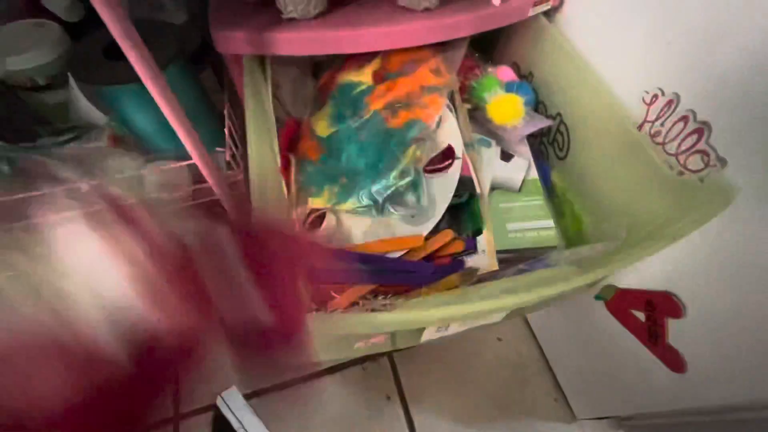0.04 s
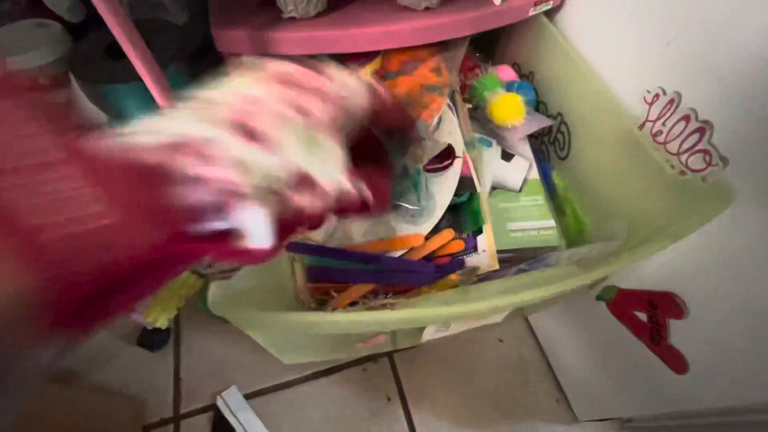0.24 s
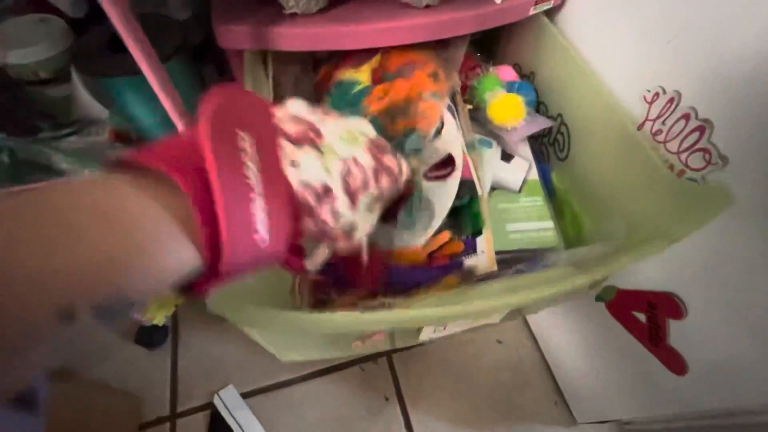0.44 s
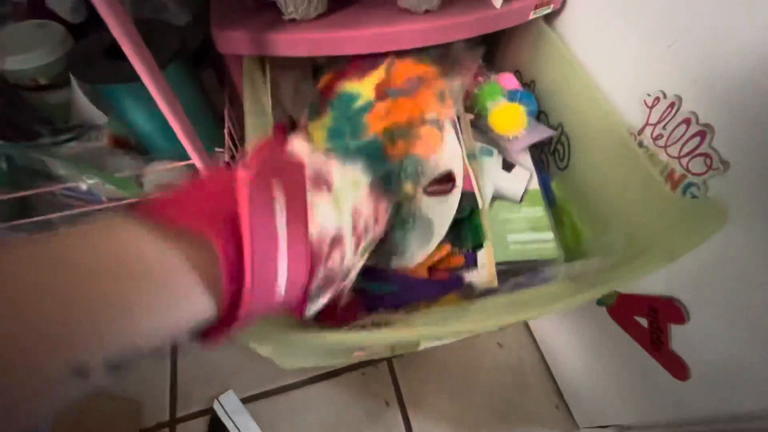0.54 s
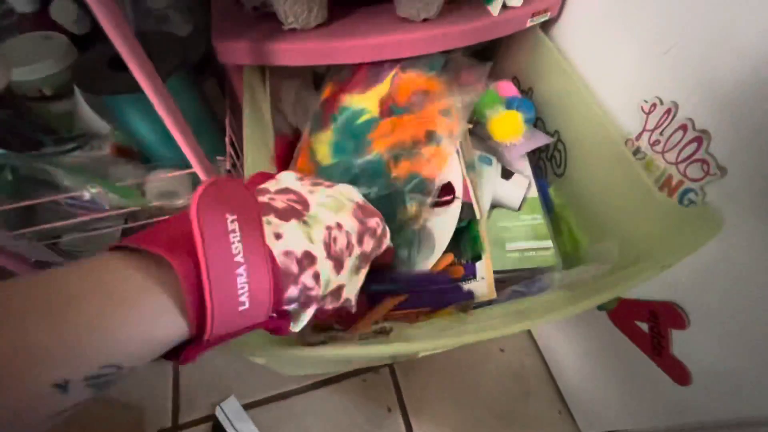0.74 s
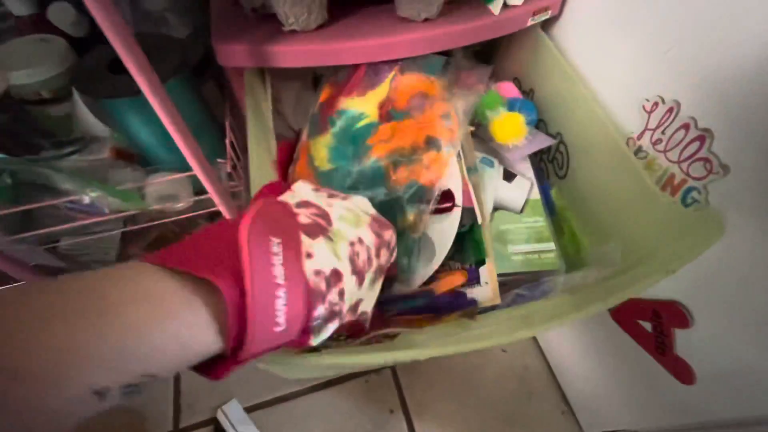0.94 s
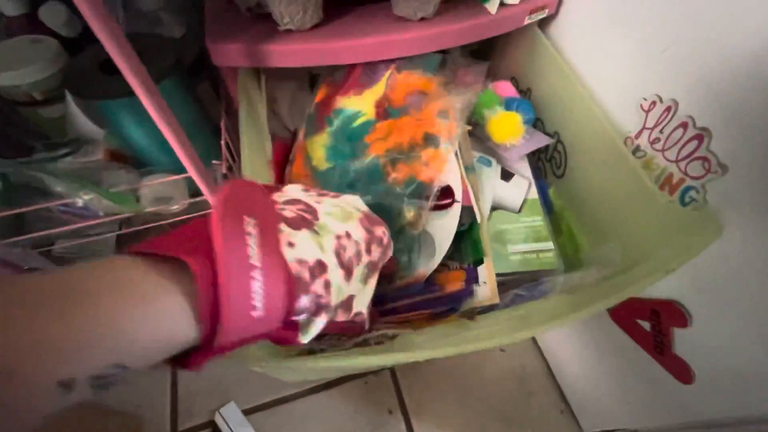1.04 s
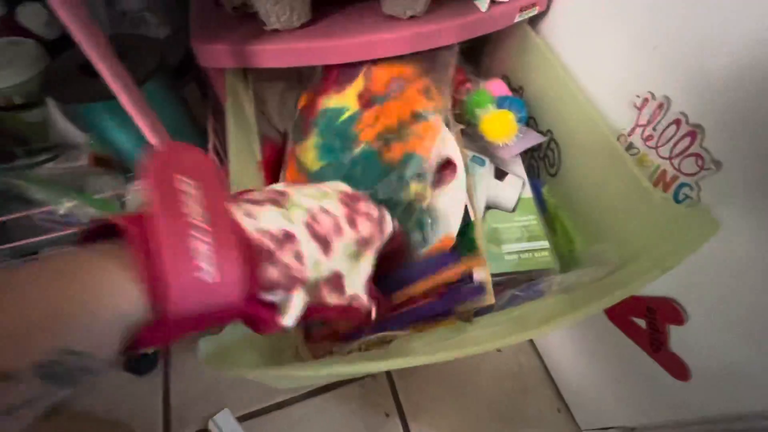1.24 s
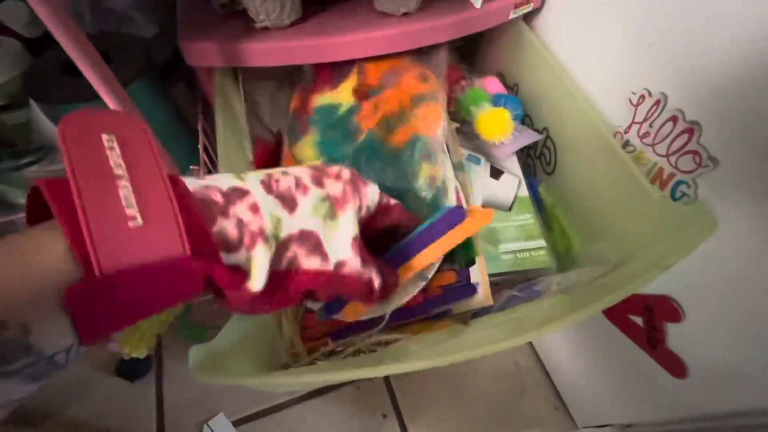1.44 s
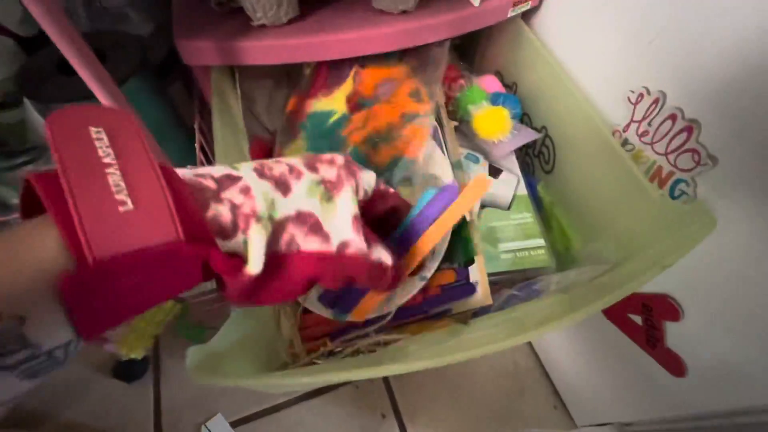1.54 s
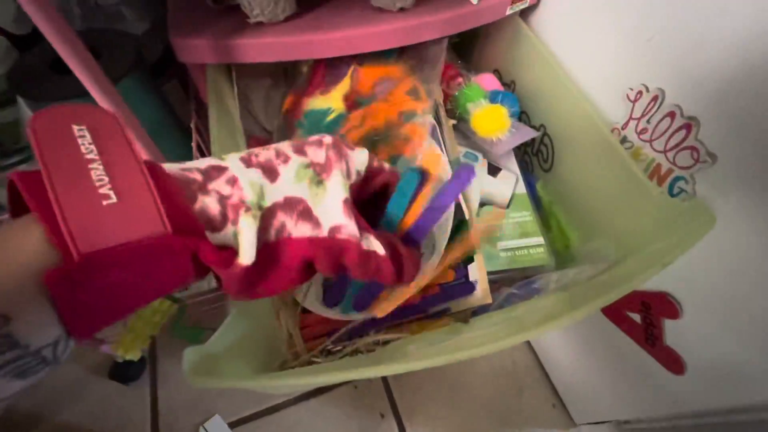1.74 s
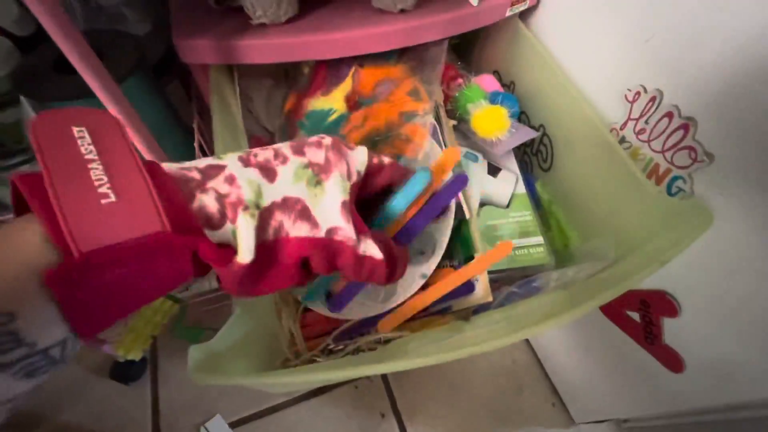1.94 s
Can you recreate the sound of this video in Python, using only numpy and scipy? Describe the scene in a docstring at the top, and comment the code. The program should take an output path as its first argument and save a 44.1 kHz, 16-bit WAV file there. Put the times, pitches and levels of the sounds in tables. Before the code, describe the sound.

A gloved hand rummages through a plastic drawer close by. Plastic film crinkles and snaps, the drawer walls thud softly, then wooden craft sticks clack together as they are pulled out, in a quietly humming room.

```python
"""Rummaging in a craft drawer

A gloved hand digs through a plastic drawer of craft things and pulls out a bundle of sticks.
Film and sticks snap in gritty bursts over a crackling rustle, the sticks clack with a woody ring,
and knocks and sliding contents make the drawer walls thud. A quiet room hums behind.
It is all heard from close by, in stereo."""
import sys
import numpy as np
from scipy import signal
from scipy.fft import rfft, irfft
from scipy.io import wavfile
from scipy.ndimage import uniform_filter1d

SR = 44100
rng = np.random.default_rng(int(sys.argv[2]) if len(sys.argv) > 2 else 0)


def persist_wave(psi):
    """Save psi, clipped to +-1, as 16-bit WAV."""
    counts = np.round(np.clip(psi, -1, 1) * 32767).astype(np.int16)
    wavfile.write(sys.argv[1], SR, np.atleast_2d(counts).T)


N = 88200

# Tone colour of the plastic film at the microphone. Each row: frequency in Hz, level in dB per Hz.
FILM_COLOUR = [(350, -6), (600, -1), (1530, -1.5), (5080, -6), (5660, -10.5), (6400, -3), (9890, -9),
               (12000, -0.5), (15500, -20)]


def amp(db):
    return 10 ** (np.asarray(db) / 20)


def rms_one(x):
    return x / np.sqrt(np.mean(x ** 2) + 1e-20)


def in_time(rows):
    seconds, values = np.transpose(rows)
    return np.interp(np.arange(N) / SR, seconds, values)


def at_hz(rows, hz, column=1):
    rows = np.array(rows, float)
    return np.interp(np.log(hz + 1), np.log(rows[:, 0]), rows[:, column])


def filtered(x, order, hz, kind):
    return signal.sosfilt(signal.butter(order, hz, kind, fs=SR, output="sos"), x)


def fade(clicks, t60, rise_s):
    """Each click becomes an envelope: quick attack, exponential decay."""
    decay = signal.lfilter([1], [1, -amp(-60 / (t60 * SR))], clicks + 1e-18)
    r = np.exp(-1 / (rise_s * SR))
    return signal.lfilter([(1 - r) ** 2], [1, -2 * r, r * r], decay)


def drift(hz):
    """A smooth random wobble, rms 1."""
    r = np.exp(-2 * np.pi * hz / SR)
    return rms_one(signal.lfilter([1], [1, -2 * r, r * r], rng.standard_normal(N + SR))[SR:])


def ring(force, hz, t60):
    """One struck mode: a decaying sine."""
    r, w = amp(-60 / (t60 * SR)), 2 * np.pi * hz / SR
    return signal.lfilter([0, np.sin(w)], [1, -2 * r * np.cos(w), r * r], force + 1e-18)


def grains(per_s, spread_db):
    """Random clicks of uneven size."""
    return (rng.random(N) < per_s / SR) * amp(spread_db * np.minimum(rng.exponential(1, N), 3))


def stereo(common, own, colour=((1, 0), (2, 0))):
    """Stereo image: a common sound blends with each side's own, shifted in phase and level by pitch."""
    # How left and right differ at each pitch; the very top sounds alike on both sides.
    # Each row: frequency in Hz, left phase lead in radians, likeness from 0 to 1, left minus right in dB.
    image = [(266, 0.43, .99, 0.5), (416, 0.99, 1, -3.5), (805, 3.3, 0.14, 9), (2630, 1.34, 0.34, -1),
             (7350, 8.52, 0.5, 2), (8800, 8.24, 0.25, -3), (11950, 7.67, 0.64, 1.2), (13900, 5.2, 1, -0.5)]
    hz = np.arange(N // 2 + 1) * SR / N
    alike = np.clip(at_hz(image, hz, column=2), 0, 1)
    left = amp(at_hz(image, hz, column=3) / 2) * np.exp(.5j * at_hz(image, hz))
    mix = np.sqrt(alike) * rfft(common) + np.sqrt(1 - alike) * rfft(own)
    return irfft(mix * amp(at_hz(colour, hz)) * [left, 1 / left], N)


def noise(colour):
    """Coloured stereo noise, rms 1."""
    return rms_one(stereo(rng.standard_normal(N), rng.standard_normal((2, N)), colour))


def room():
    """Room tone: a quiet, steady hum of low noise."""
    # Colour of the hum. Each row: frequency in Hz, level in dB per Hz.
    hum_colour = [(18, -46), (30, -17), (123, 5), (186, -20), (328, -4.5), (14000, -34.5)]
    return amp(-45) * noise(hum_colour)


def rustle():
    """Film under the hand crackles in clumps over a wavering hiss; the glove swishes brightly past."""
    # Swell of the rustle. Each row: time in seconds, level in dB.
    swell = [(0, -46), (.05, -34), (.09, -49.5), (.22, -56.5), (.245, -23.5), (.33, -36), (.45, -29),
             (.6, -30), (.69, -36), (.8, -32), (.87, -40), (1.28, -28.5), (1.4, -35), (1.54, -48.5),
             (1.6, -33.5), (1.65, -42), (1.74, -34), (1.83, -45), (1.875, -38), (2, -45)]
    # Brushes of the glove. Each row: middle in seconds, length in seconds, level in dB.
    swishes = [(1.589, 0.048, -23), (1.632, 0.01, -22.5)]
    edges_hz = 700 * 1.67 ** np.arange(7)
    film, clumps_db = noise(FILM_COLOUR), 4 * drift(hz=22)
    texture = amp(-3 + 1.27 * drift(hz=4.6)) * film   # the hiss
    for band_hz in zip(edges_hz, edges_hz[1:]):   # each band crackles on its own
        clicks = grains(per_s=90 * amp(clumps_db), spread_db=4)
        crackle = rms_one(fade(clicks, t60=.009, rise_s=.0006))
        texture += amp(-2) * crackle * filtered(film, 1, band_hz, "band")
    t = np.arange(N) / SR
    brush = sum(amp(db) * np.exp(-(2 * (t - middle) / length) ** 2) for middle, length, db in swishes)
    return amp(in_time(swell)) * texture + brush * rms_one(filtered(film, 2, 8000, "high"))


def drawer():
    """Small bumps of sliding contents and soft knocks of the hand ring the plastic walls."""
    # Modes of the walls. Each row: pitch in Hz, gain in dB, time to fall 60 dB in seconds.
    modes = [(71, 6, 0.062), (111.4, -2.5, 0.062), (242, 4.5, 0.035), (318, 8, 0.035), (460, -4, 0.083),
             (726, -3.5, 0.066), (956, -12, 0.15)]
    # Contents sliding on the drawer. Each row: time in seconds, level in dB.
    sliding = [(.22, -42.5), (.3, -35), (1.35, -36.5), (1.45, -42.5)]
    # Knocks of the hand. Each row: start in seconds, strength in dB, pitch of the push in Hz.
    knocks = [(0.266, -18.5, 337), (0.329, -24, 600), (0.474, -13.5, 420), (0.484, -7.5, 210),
              (0.49, -12.5, 81), (0.515, -23, 204), (0.75, -21, 85), (0.944, -21.5, 444),
              (1.2393, -13.5, 416), (1.257, -20, 225), (1.292, -18, 235), (1.334, -20, 139),
              (1.356, -25, 62.6)]

    def walls(force):
        return sum(amp(db) * ring(force, hz, t60) for hz, db, t60 in modes)

    force = np.zeros(N)
    for start, db, hz in knocks:
        at, n = int(start * SR), int(2 * SR / hz)   # a push lasts two cycles
        push = signal.windows.hann(n) * np.sin(2 * np.pi * hz * np.arange(n) / SR)
        force[at:at + n] += amp(db) * push * 2 / n
        force[at] += amp(db - 24.5)   # the hard first touch
    thuds = walls(force)
    # One stream of bumps is common, and each side has one of its own.
    bumps = [grains(per_s=300, spread_db=2.65) * rng.choice([-1, 1], N) for _ in range(3)]
    shuffle = amp(in_time(sliding)) * np.array([rms_one(walls(stream)) for stream in bumps])
    return stereo(thuds + shuffle[0], thuds * [[1], [-1]] + shuffle[1:])


def snaps():
    """Film and sticks snap: each snap is a clump of tinier cracks with a faint tail, in three bands."""
    # The snaps. Each row: start in seconds, low band level in dB, top band level in dB.
    hits = [(0.244, -17, -10), (0.2501, -23, -11), (0.259, -17, -2.5), (0.263, -26, -11.5),
            (0.2712, -18.5, -17), (0.2938, -22, -7.5), (0.316, -50, -32), (0.356, -26, -13.5),
            (0.4303, -18.5, -10), (0.433, -50, -10.5), (0.444, -20.5, -11), (0.4522, -20.5, -35),
            (0.4914, -19, -18), (0.5124, -22, -13.5), (0.5211, -26, -17.5), (0.559, -37, -33),
            (0.5755, -18.5, -15.5), (0.587, -19, -8), (0.597, -20.5, -9), (0.633, -30, -15.5),
            (0.658, -34, -25.5), (0.713, -29, -20.5), (0.765, -35, -17.5), (0.796, -33.5, -19),
            (0.911, -24, -27.5), (0.9163, -26, -12.5), (1.0502, -38, -26), (1.087, -29.5, -19.5),
            (1.134, -24.5, -18.5), (1.2373, -21, -24), (1.276, -20.5, -18), (1.2821, -22, -9.5),
            (1.334, -25, -17.5), (1.366, -28, -19), (1.374, -25, -18), (1.382, -19.5, -4), (1.487, -18, -5),
            (1.671, -42, -6.5), (1.702, -59, -26), (1.7198, -25.5, -10), (1.743, -32, -23),
            (1.804, -36, -32), (1.965, -46, -29)]
    starts, low_db, top_db = np.transpose(hits)
    middle_db = low_db + .66 * (top_db - low_db)
    low_hz, top_hz = 3960, 6700
    crest_db, rise_s, snap_t60 = 5.5, .0007, .009
    bands = [(low_hz, "low", low_db, 1.3), ([low_hz, top_hz], "band", middle_db, 1.05),
             (top_hz, "high", top_db, .75)]
    film = noise(FILM_COLOUR)
    grit = rms_one(amp(3.5 * drift(hz=1500)))
    out = 0
    for hz, kind, db, stretch in bands:   # the lows linger, the top dies first
        clicks = np.zeros(N)
        clicks[(starts * SR).astype(int)] = amp(db + crest_db)
        burst = grit * fade(clicks, stretch * snap_t60, rise_s)
        tail = amp(-20) * fade(clicks, t60=.086, rise_s=rise_s)
        band = filtered(film, 3, hz, kind)
        band_rms = np.sqrt(uniform_filter1d(np.mean(band ** 2, axis=0), size=130))   # over 3 ms
        out = out + (burst + tail) * band / band_rms
    return out


def stick_clacks():
    """Sticks clack together: 3 ms of uneven touches ring the woody modes near the blow's pitch."""
    # The clacks. Each row: start in seconds, strength in dB, pitch the blow favours in Hz.
    clacks = [(0.2497, -2, 1310), (1.164, -12, 1680), (1.192, -14.5, 2640), (1.3136, -16, 2300),
              (1.3668, -8, 2330), (1.604, -19.5, 2820), (1.7227, -11.5, 4020)]
    # Modes of the bundle, each a pitch in Hz.
    modes_hz = [1060, 1553, 2493, 2760, 3500, 3970, 4970]
    loss_db_per_octave, contact_samples = 22, 130
    contact_db = -17 - .1 * np.arange(contact_samples)
    touches = np.zeros((len(modes_hz), 3, N))   # per mode: common, left, right
    for start, db, hz in clacks:
        at = int(start * SR)
        octaves_away = np.abs(np.log2(np.divide(modes_hz, hz)))[:, None, None]
        strength = amp(db + contact_db - loss_db_per_octave * octaves_away)
        chatter = rng.standard_normal((len(modes_hz), 3, contact_samples))
        touches[..., at:at + contact_samples] = strength * chatter
    wood = sum(ring(force, hz, t60=.021) for force, hz in zip(touches, modes_hz))
    return stereo(wood[0], wood[1:])


def scene():
    return snaps() + stick_clacks() + rustle() + drawer() + room()


def record(dry):
    """Deep bass is cut, peaks clip at full scale, and the very top is cut steeply."""
    clipped = np.clip(filtered(dry, 4, 54, "high"), -1, 1)
    return signal.sosfilt(signal.cheby2(20, 60, 16250, fs=SR, output="sos"), clipped)


dry = scene()
out = record(dry)
persist_wave(out)
```